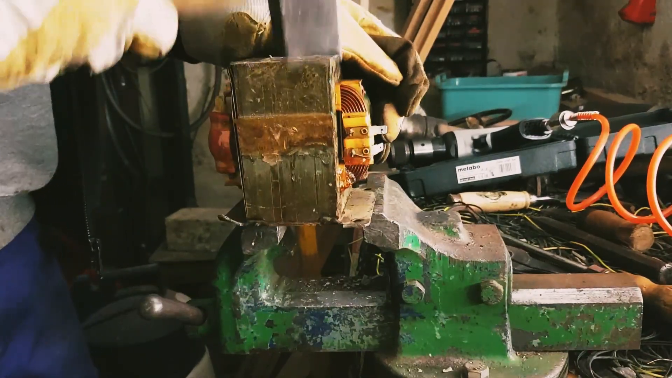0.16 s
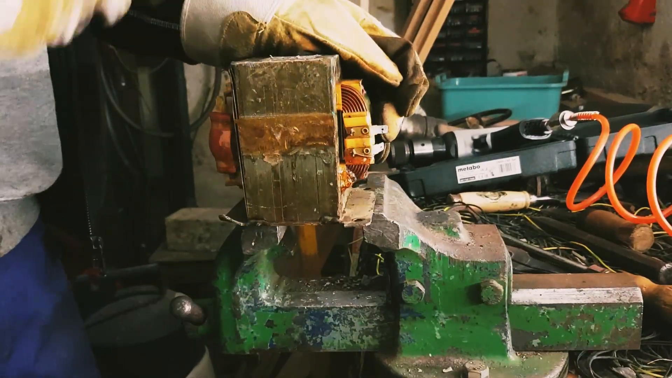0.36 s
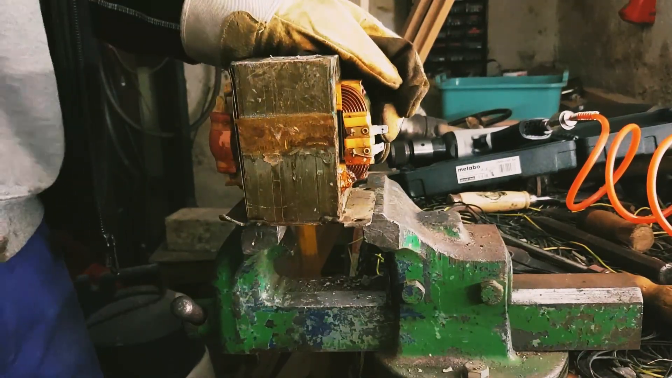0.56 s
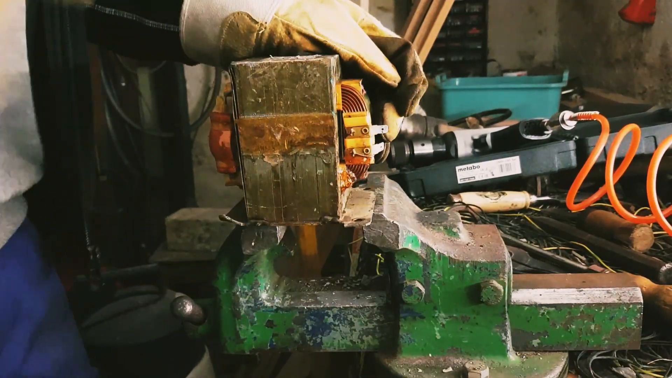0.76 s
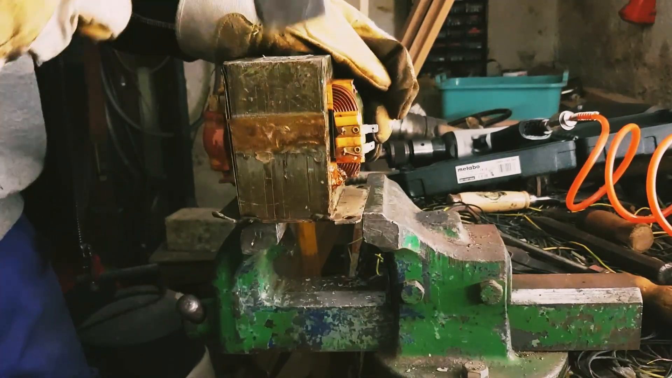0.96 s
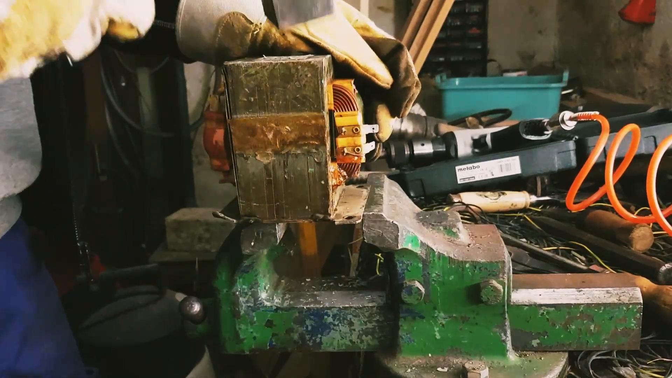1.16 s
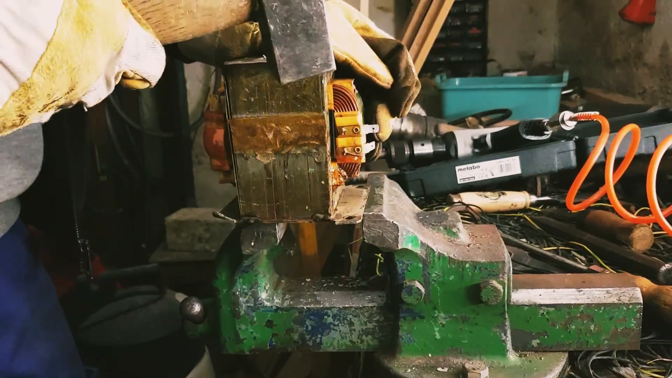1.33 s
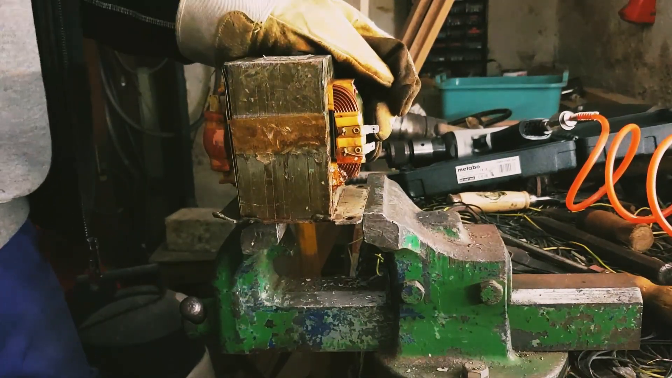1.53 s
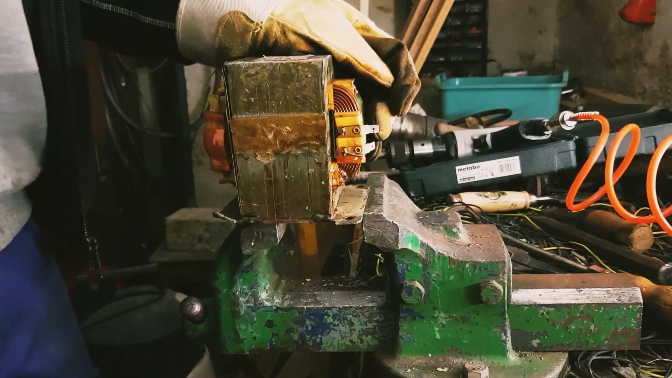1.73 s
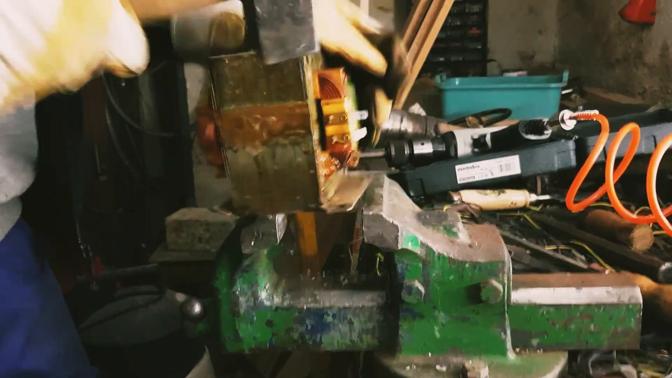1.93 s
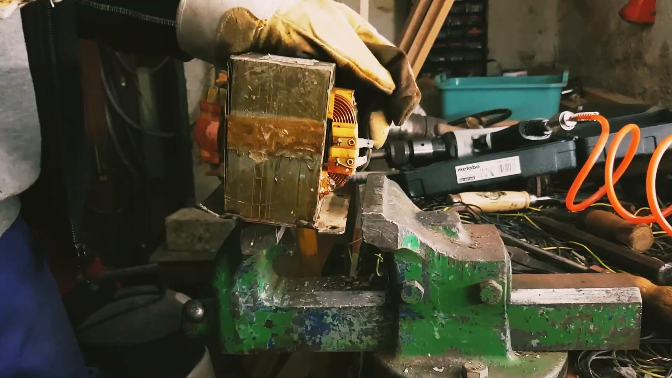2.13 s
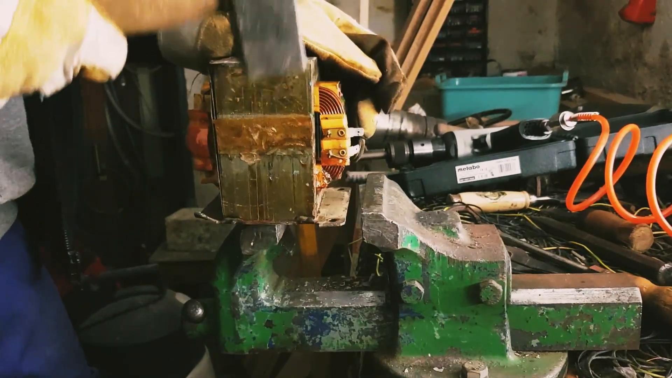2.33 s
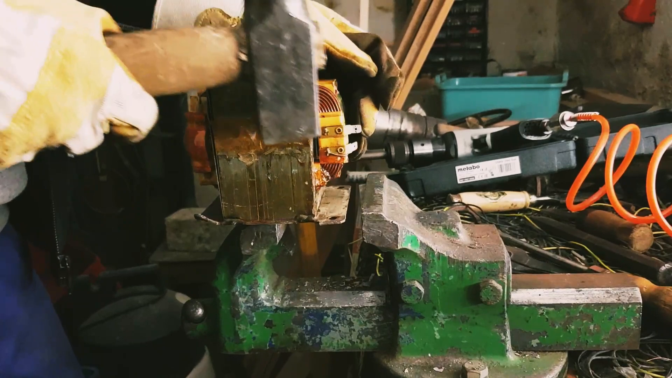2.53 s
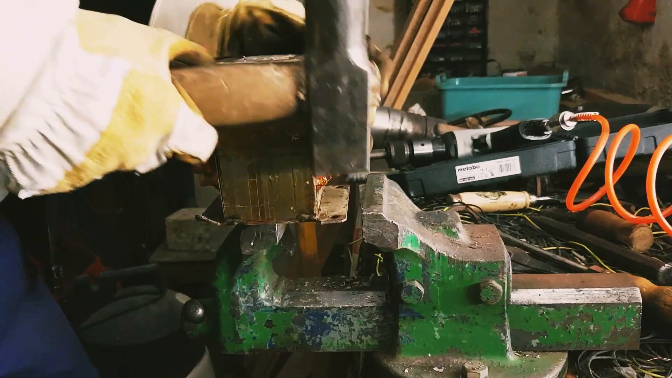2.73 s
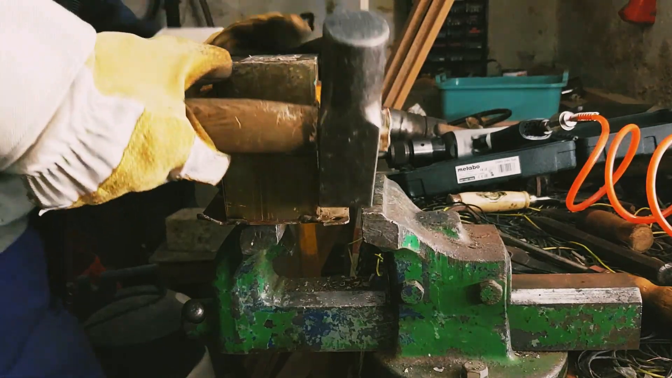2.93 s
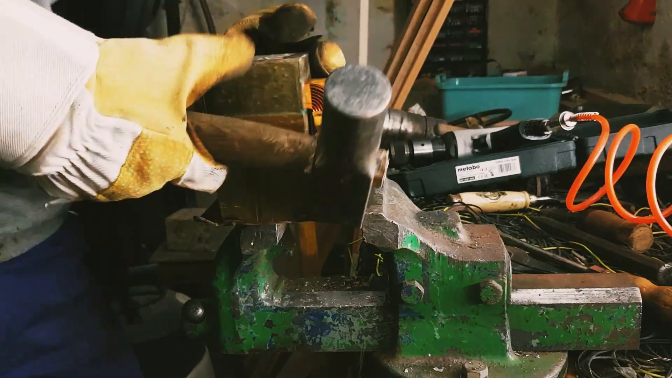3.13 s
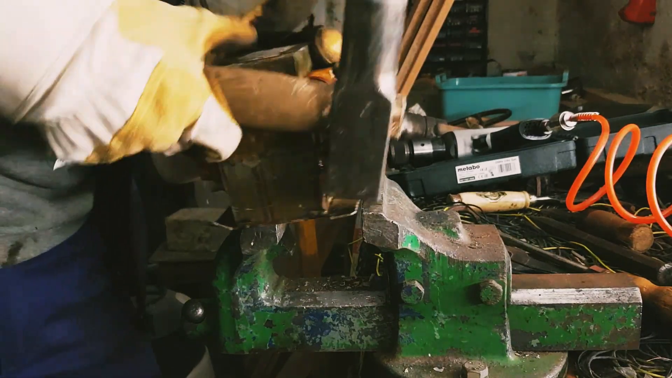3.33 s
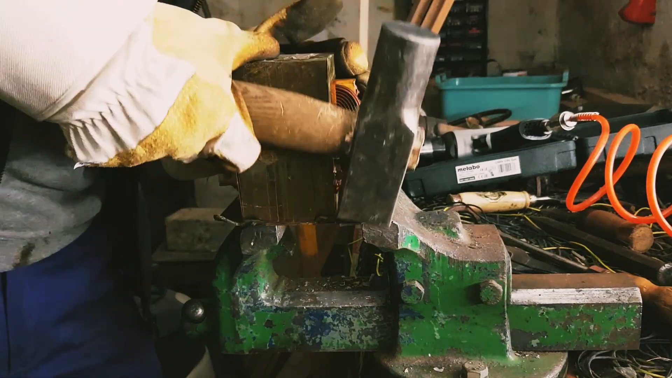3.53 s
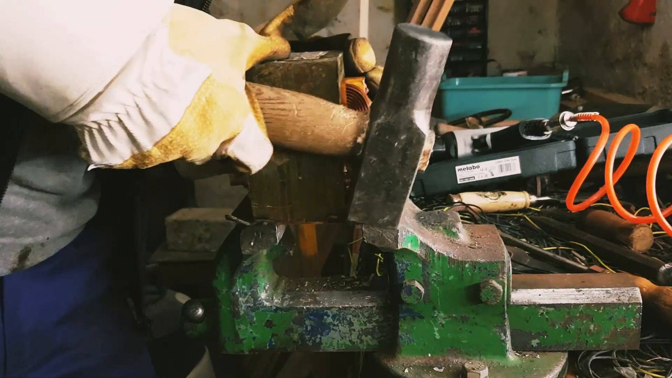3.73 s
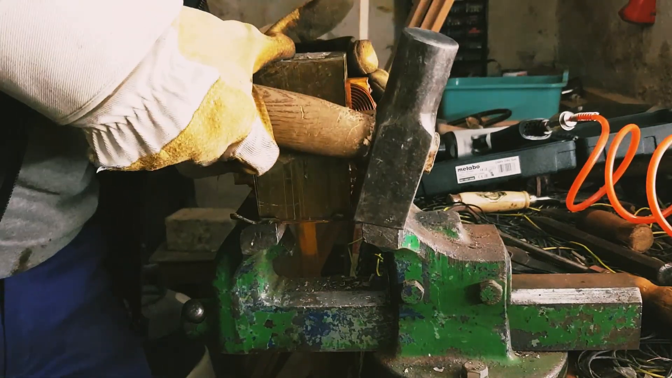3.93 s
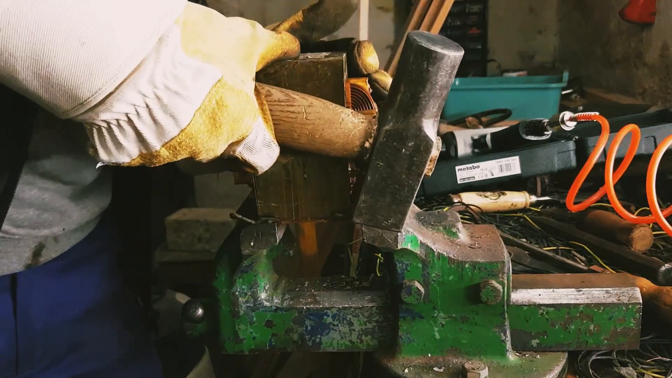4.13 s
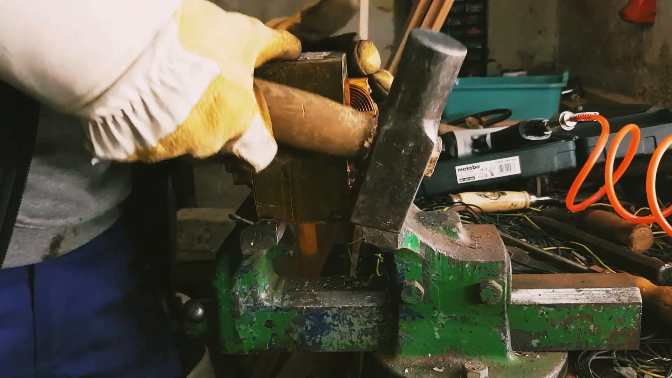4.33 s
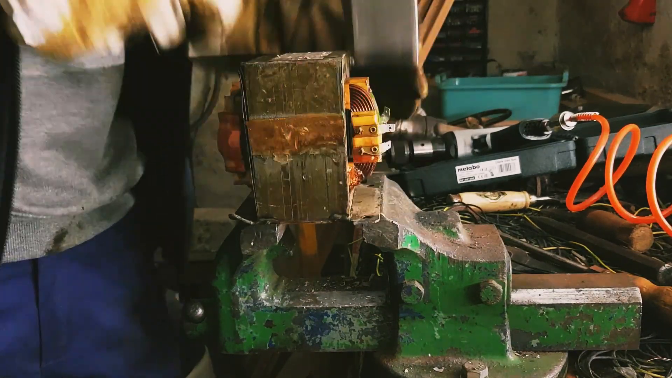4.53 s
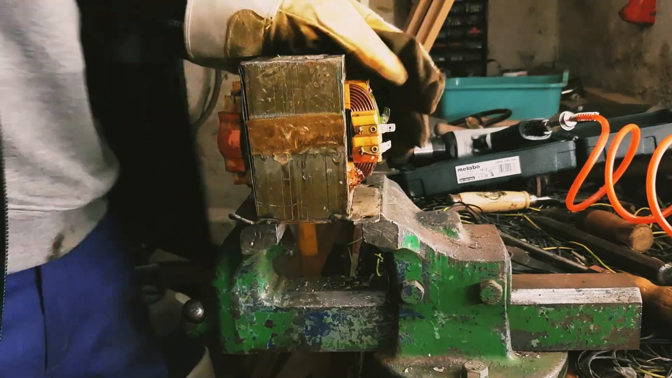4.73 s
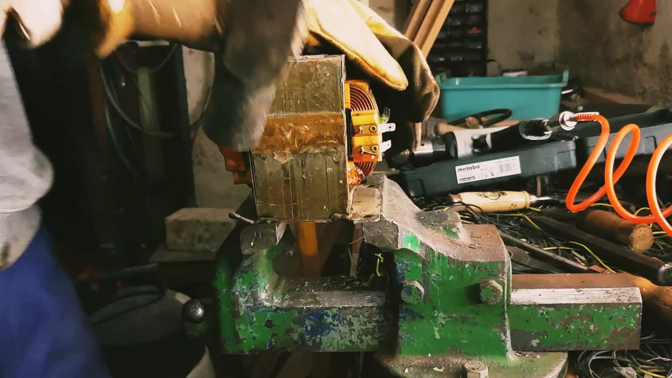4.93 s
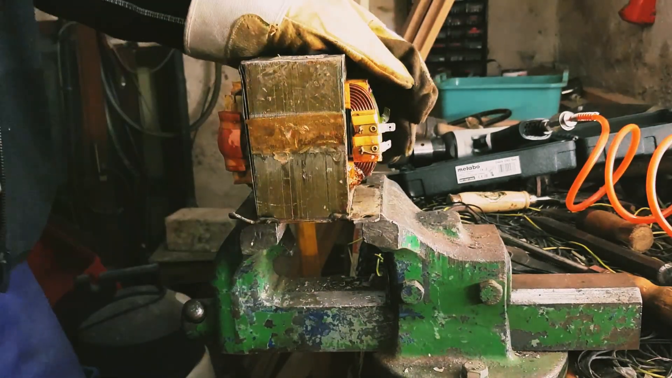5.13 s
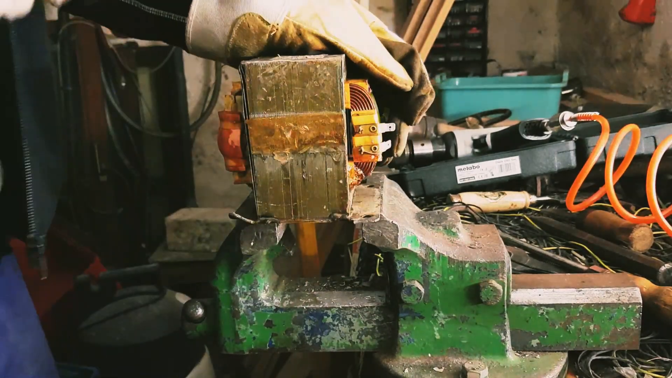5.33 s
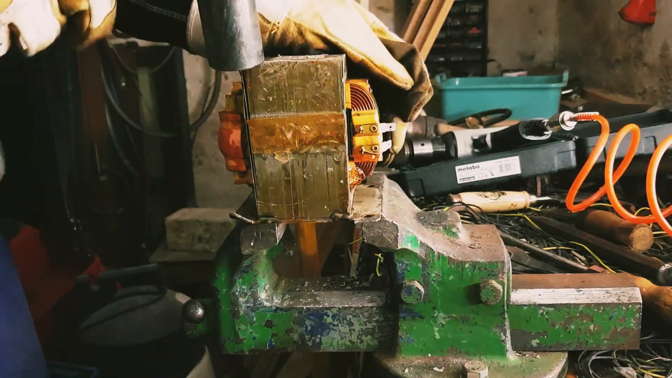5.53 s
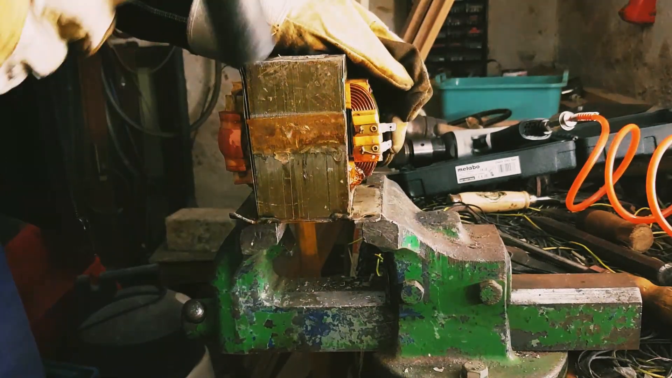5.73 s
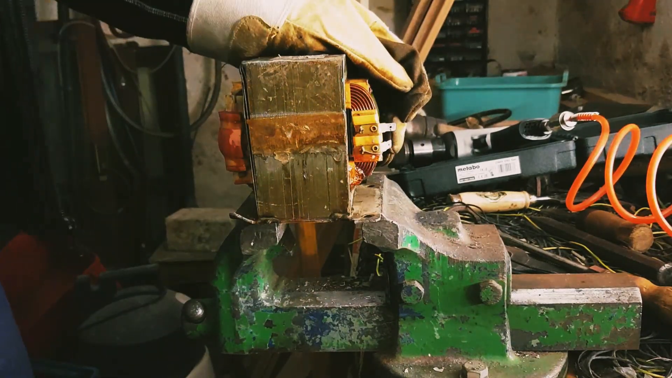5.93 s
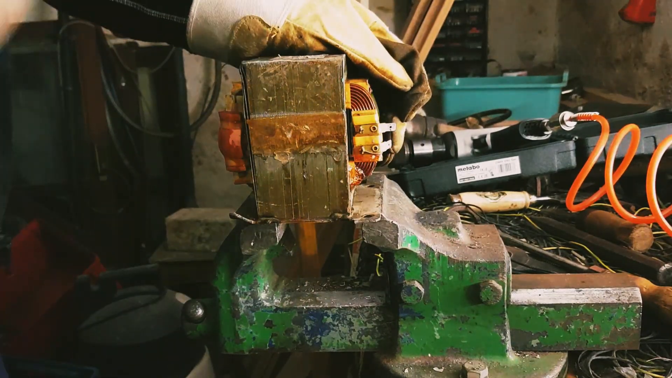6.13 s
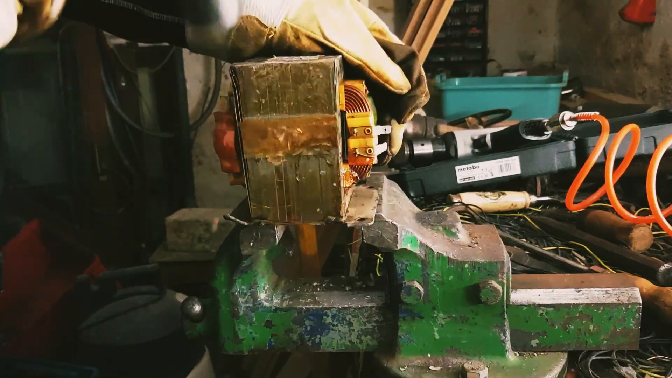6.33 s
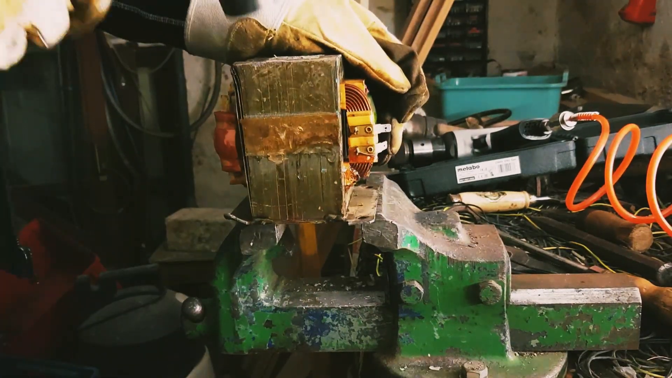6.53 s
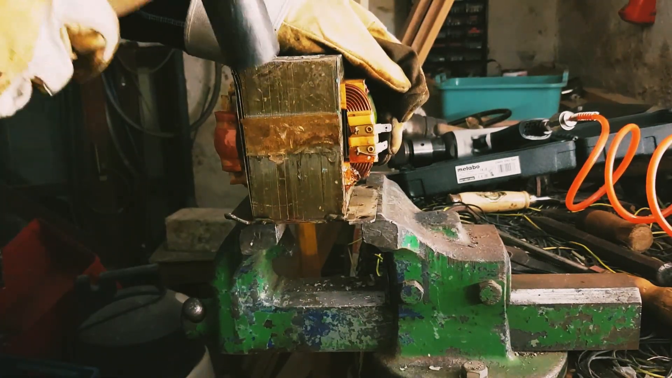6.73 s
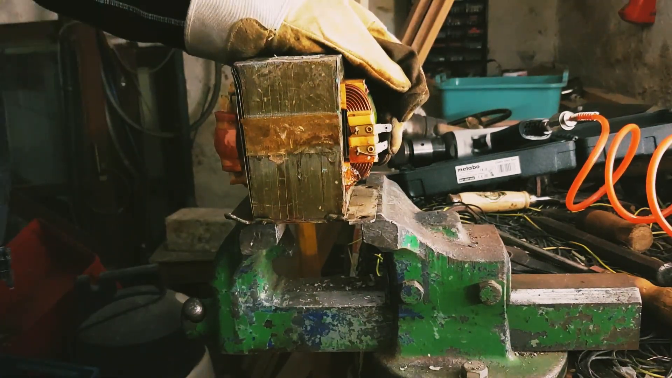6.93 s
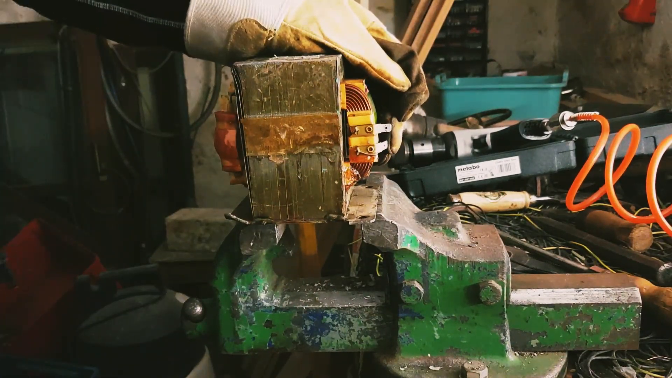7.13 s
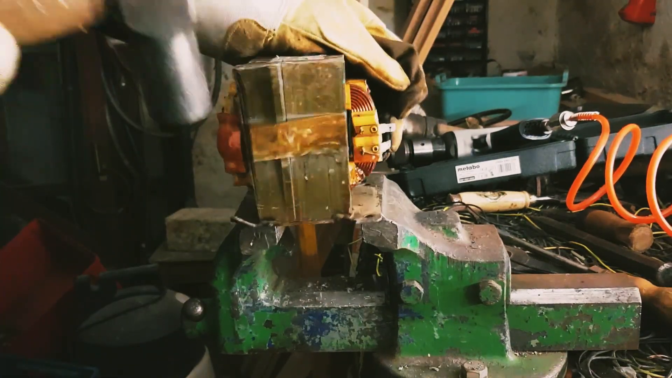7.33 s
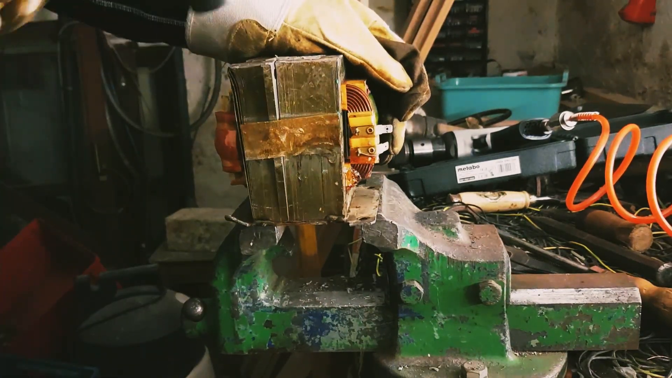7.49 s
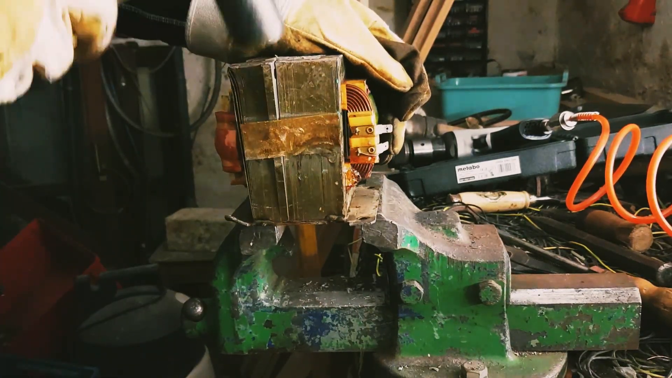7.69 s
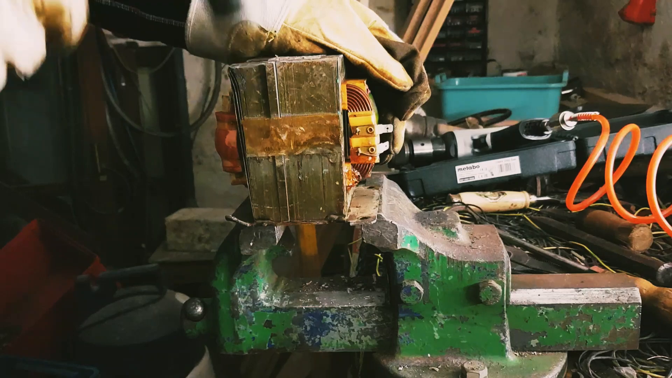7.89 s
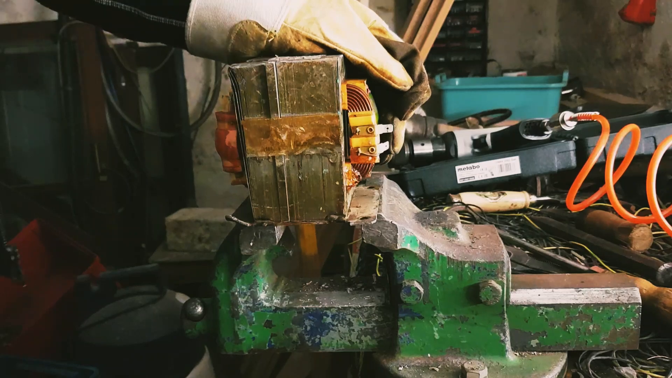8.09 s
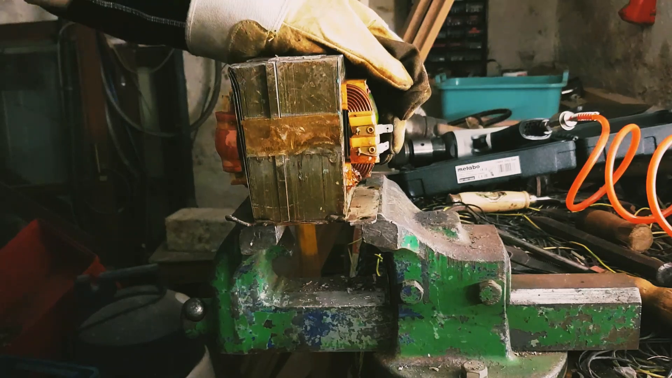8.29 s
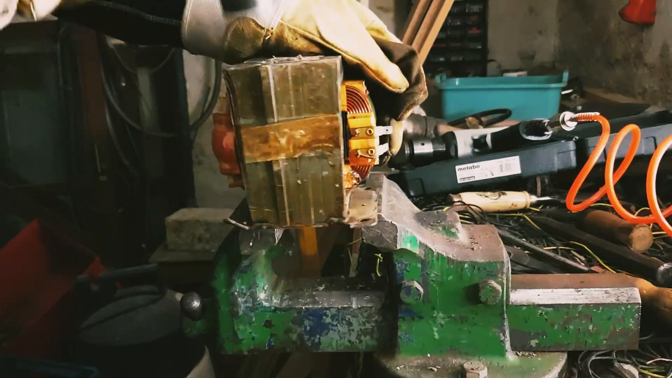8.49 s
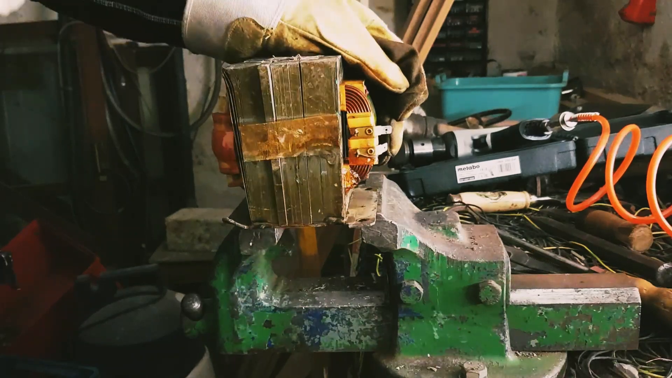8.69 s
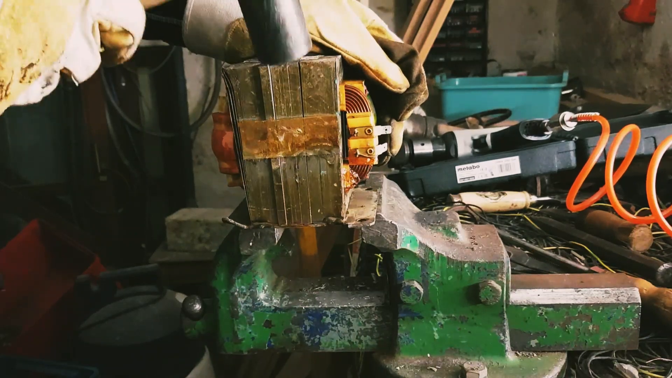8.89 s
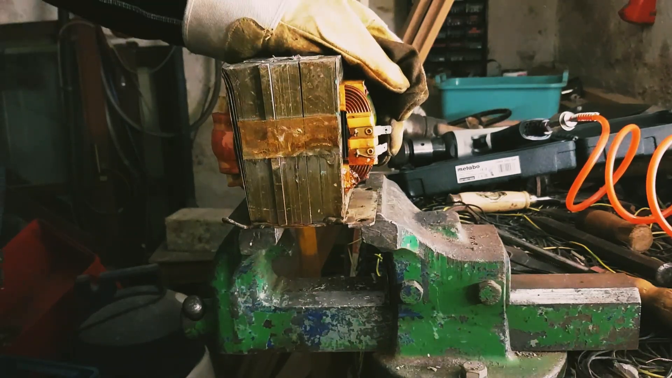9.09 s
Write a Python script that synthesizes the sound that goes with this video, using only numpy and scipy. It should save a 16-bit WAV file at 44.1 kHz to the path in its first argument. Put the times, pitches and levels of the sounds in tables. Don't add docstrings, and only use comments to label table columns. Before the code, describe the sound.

In a small hard-walled workshop, a hammer strikes a laminated steel core clamped in a vise. Two bright, ringing blows come first, then a pause with glove rustle and small knocks, then four more blows about a second apart, each but the first of them sharply ringing. Light taps fall between. Close stereo microphone, the loud onsets squashed and slightly clipped.

```python
import sys
import numpy as np
from scipy import signal
from scipy.io import wavfile

SR = 44100
rng = np.random.default_rng(int(sys.argv[2]) if len(sys.argv) > 2 else 0)


def invert_db(x):
    u = np.asarray(x, float) / 20
    return 10 ** u


def dump_mix(stems):
    frames = np.atleast_2d(stems).T
    limited = np.clip(frames, -1, 1)
    pcm = np.round(limited * 32767).astype(np.int16)
    wavfile.write(sys.argv[1], SR, pcm)


N = 403515

# start_s, clack_db, clack_hz, thud_under_clack_db
KNOCKS = [(0.033, -31.5, 625, -6.5), (0.37, -42, 550, -2.5), (1.300, -29, 1098, -27),
          (1.300, -31.5, 2798, -27), (1.178, -40, 2082, -29), (2.669, -39.5, 930, -21.5),
          (2.763, -46.5, 900, -8), (2.987, -45.5, 1370, -38), (3.062, -48, 867, -24),
          (3.25, -52, 1070, -19), (3.368, -43, 558, -4.5), (3.417, -42.5, 494, 6.5), (3.499, -62, 518, -4),
          (3.594, -45, 685, -13), (3.882, -41.5, 737, -15), (4.29, -42, 760, -16.5), (4.377, -47, 744, -4),
          (4.449, -51, 560, -8.5), (4.836, -45, 3640, -8), (5.328, -52, 3996, -16), (7.518, -54, 546, -6),
          (7.94, -42.5, 1448, -23), (7.944, -47, 3870, -26), (8.03, -56, 483, -18.5),
          (8.078, -53, 3850, -34)]
# start_s, level_db, pitch_hz
TAP_TONES = [(1.301, -35, 1590), (8.857, -48, 2500), (2.672, -55, 1250), (3.065, -63, 1250),
             (3.5, -65, 1250), (3.886, -57, 1800), (4.294, -58, 1800), (0.208, -42, 1500),
             (4.755, -43, 2450), (5.403, -20, 1450), (6.66, -58, 750), (7.765, -50, 2200)]


def at_hz(points, hz, column=1):
    points = np.array(points)
    return np.interp(np.log(hz), np.log(points[:, 0]), points[:, column])


def fall(x, t60):
    return signal.lfilter([1], [1, -invert_db(-60 / (max(t60, .001) * SR))], x + 1e-18)


def smooth(x, seconds):
    r = np.exp(-1 / (max(seconds, 1e-5) * SR))
    return signal.lfilter([1 - r], [1, -r], x)


def ring(force, hz, t60):
    r, w = invert_db(-60 / (t60 * SR)), 2 * np.pi * hz / SR
    return signal.lfilter([0, np.sin(w)], [1, -2 * r * np.cos(w), r * r], force + 1e-18)


def flicker(rate):
    steps = rng.standard_normal(int(N / SR * 200) + 2)
    return np.interp(np.arange(N) / SR * rate, np.arange(len(steps)), steps)


def train(hits, heights):
    out = np.zeros(N)
    np.add.at(out, np.round(hits[:, 0] * SR).astype(int), heights)
    return out


def in_room(tone):
    ports = []
    for lean_db in (-3, -1):
        beating = 1 + .9 * flicker(130.0)
        ports.append(tone * beating * invert_db(2.5 * flicker(18.0) + lean_db))
    return np.array(ports)


def layers(rows, crack_db, clatter_db):
    s, force_db, weight_db, bright_db = np.transpose(rows)
    crack_level_db = force_db + crack_db + 0.62 * bright_db
    clatter_level_db = force_db + clatter_db + 0.12 * bright_db
    return np.transpose([s, crack_level_db, force_db + weight_db, force_db,
                         clatter_level_db, force_db + bright_db])


def small_contacts():
    # start_s, level_db, pitch_hz
    thuds = [(0.209, -36, 250), (1.057, -34, 150), (1.177, -44, 127), (1.301, -44, 250), (2.187, -62, 183),
             (2.69, -60, 320.4), (3.123, -65, 334), (3.309, -50.5, 161), (3.848, -41.5, 253),
             (4.089, -52.5, 256), (6.659, -32.5, 170), (7.569, -49.5, 124), (7.767, -37, 165),
             (8.67, -44.5, 121), (8.857, -57, 260)]
    # start_s, level_db
    ticks = [(0.033, -70), (0.37, -66), (.82, -62), (1.059, -63), (1.178, -57), (2.187, -65), (2.563, -53),
             (2.987, -65), (3.125, -44.5), (3.309, -72), (3.499, -66), (4.377, -65), (4.836, -64),
             (5.329, -68.5), (5.702, -58), (5.79, -67.5), (7.518, -63), (7.568, -61), (7.94, -59.5),
             (8.67, -49.5), (9.089, -65)]
    off, hz = -200, 248
    sizzle_db = -36.5
    rows = [(s, db, clack_hz, db + thud_db, hz, db + sizzle_db) for s, db, clack_hz, thud_db in KNOCKS]
    rows += [(s, db, tone_hz, off, hz, off) for s, db, tone_hz in TAP_TONES]
    rows += [(s, off, hz, db, thud_hz, off) for s, db, thud_hz in thuds]
    rows += [(s, off, hz, off, hz, db) for s, db in ticks]
    return np.array(rows)


def room_boom():
    # pitch_hz, level_db, t60_s
    hz, level_db, t60 = (67, -37.5, 1.3)
    return ring(invert_db(level_db) * (np.arange(N) == 0), hz, t60)


def whine():
    # pitch_hz, level_db, t60_s, damped_s
    hz, level_db, t60, damped_s = (8539.5, -57, 46, 0.27)
    t = np.arange(N) / SR
    touch_db = 200 * np.maximum(t - damped_s, 0)
    return invert_db(level_db - 60 * t / t60 - touch_db) * np.sin(2 * np.pi * hz * t)


def layer_shares(hz):
    layer_hz = (160, 800, 2800, 9000)
    return np.array([np.interp(np.log(hz), np.log(layer_hz), row) for row in np.eye(4)])


def knock_heights(knocks, hz):
    s, clack_db, clack_hz, thud_db, thud_hz, sizzle_db = knocks.T
    clack_octaves = np.log2(hz / clack_hz) / 0.82
    thud_octaves = np.log2(hz / thud_hz) / 0.66
    clack = invert_db(clack_db - 16.0 - 12.0 * clack_octaves ** 2) / np.sqrt(clack_hz / 1000)
    thud = invert_db(thud_db + 3.5 - 17 * thud_octaves ** 2)
    sizzle = invert_db(sizzle_db - 11) / (1 + (5113 / hz) ** 3)
    return np.sqrt(clack ** 2 + thud ** 2 + sizzle ** 2) * invert_db(10.5)


def rub_heights(hz):
    # start_s (centre), half_length_s, level_db (middle pitch), tilt_db (per octave)
    rubs = [(0.61, .08, -88, -19.5), (1.622, 0.084, -103, -23), (3.214, 0.045, -93, 17),
            (3.317, 0.019, -99.5, 16.5), (2.873, .06, -77.5, -4), (3.78, .04, -89, -18.5),
            (4.231, 0.028, -83, -16), (0.35, 0.055, -57.5, -11), (4.689, 0.062, -64.5, 0.5),
            (5.007, 0.059, -60, -2), (5.223, 0.042, -47, -1.5), (6.213, 0.051, -69.5, 3),
            (8.055, 0.14, -77.5, -5)]
    t = np.arange(0, N + 64, 64) / SR
    octaves = np.log2(max(hz, 450) / 1403.5)
    bells = 0
    for s, half, level_db, tilt_db in rubs:
        spectrum_db = level_db + tilt_db * octaves - 2.06 * octaves ** 2
        bells = bells + invert_db(spectrum_db - 12 * ((t - s) / half) ** 2)
    return np.repeat(bells, 64)[:N]


def clatter_and_rustle(blows, taps, knocks):
    # pitch_hz, density_db (per Hz)
    colour = [(24, -46), (40, -19.5), (138, -8.5), (263, -7), (582, -12.5), (643, -11.5), (956, -16),
              (1870, -16), (2580, -18), (4230, -20), (7490, -32.5), (10100, -26.5), (13900, -30),
              (15000, -35)]
    # pitch_hz, density_db (per Hz)
    hush_colour = [(40, -15), (64, -2), (135, -11), (263, -9.5), (600, -11.5), (2450, -17), (5400, -20),
                   (8000, -29), (11000, -19), (15000, -20.5)]
    # pitch_hz, rise_s, t60_s, late_tail_db, late_t60_s
    dying = [(40, 0.031, 0.67, -17.5, 1.9), (111, 0.026, .45, -21, .9), (370, 0.012, 0.3, -29, 0.59),
             (1500, 0.004, .27, -36.5, 0.58), (5000, 0.0027, 0.23, -39.5, 0.97),
             (15000, 0.0013, 0.17, -40, 0.4)]
    # pitch_hz, correlation (-1 to 1)
    likeness = [(60, 0.93), (180, 0.89), (550, 0.49), (1650, 0.32), (4970, -0.084), (15000, -0.22)]
    # pitch_hz, difference_db
    lean = [(60, 0), (240, -2.5), (950, -4), (3770, -5.5), (15000, -3)]
    # start_s, activity (0-1)
    handling = [(0.0, 0.83), (.7, 0.15), (1.5, 0.05), (1.8, 0), (2.25, 0.05), (2.4, 0.39), (2.6, 0.07),
                (3.4, 0.48), (3.6, 0.24), (4.25, 0.15), (4.44, 0.69), (4.55, 0.59), (4.7, 0.32),
                (4.95, 0.83), (5.599, 0.9), (5.8, 0.76), (5.951, 0.5), (6.2, 0.17)]
    quiet_db = (-99, -94, -87, -90.5)
    busy_db = (-63, -70.5, -63.5, -63)
    waking = (0.12, .7, 0.79, 1.1)
    out = np.zeros((2, N))
    edges = 36 * 2 ** (np.arange(27.5) / 3)
    white = rng.standard_normal((2, 2, N))
    busy = np.clip(np.interp(np.arange(0, N, 64) / SR, *np.transpose(handling), right=0), 0, 1)
    rubbing_db = np.array([still + (full - still) * busy ** power
                           for still, full, power in zip(quiet_db, busy_db, waking)])
    grit, loose = invert_db(1.7 * flicker(41.0)), invert_db(0.98 * flicker(55.0))
    for k, (low, high) in enumerate(zip(edges, edges[1:])):
        band = signal.butter(2, [low, high], "band", fs=SR, output="sos")
        mid, side = signal.sosfilt(band, white[k % 2])
        hz = min(np.sqrt(low * high), 14500)
        shares, colour_db = layer_shares(hz), at_hz(colour, hz)
        rise, t60, late_db, late_t60 = [at_hz(dying, hz, column=c) for c in range(1, 5)]
        heavy = train(blows, invert_db(blows[:, 2:] @ shares + colour_db + 18))
        light = train(taps, invert_db(taps[:, 2:] @ shares + colour_db + 18.5))
        light = light + train(knocks, knock_heights(knocks, hz))
        struck = smooth(heavy, rise) + smooth(light, 0.12 * rise)
        answer = (fall(struck, t60) + invert_db(late_db) * fall(struck, late_t60)) * loose
        activity_db = np.repeat(shares @ rubbing_db, repeats=-(-N // len(busy)))[:N]
        hush = invert_db(activity_db + at_hz(hush_colour, hz) + 22.5)
        rubbing = grit * (hush + invert_db(6.0) * rub_heights(hz))
        alike = np.clip(at_hz(likeness, hz) - 0.083 * shares[1:].sum(), -1, 1)
        stereo = np.sqrt(1 + alike) * mid + np.sqrt(1 - alike) * side * [[1], [-1]]
        balance = invert_db(at_hz(lean, hz) / 2 * np.array([[1], [-1]]))
        out += np.hypot(answer, rubbing) * stereo * balance
    return out


def bench(blows, taps, knocks):
    # pitch_hz, level_db, t60_s
    low_modes = [(49.4, -17.5, 0.96), (71.9, -8.5, 0.9), (107, -17, 0.31), (146.4, 4, 0.19),
                 (173.6, -2, 0.49), (240.4, 0, 0.27), (262, 0, 0.3), (328.3, -1, 0.25), (377.7, -1.5, .33),
                 (437, -6, 0.35), (483, -10.5, 0.44), (609, -10.5, 0.29), (753, -3, .22)]
    pushes = train(blows, invert_db(blows[:, 2] - 35)) + train(taps, invert_db(taps[:, 2] - 37))
    hard = smooth(fall(pushes, 0.14), 0.01)
    soft = smooth(fall(train(knocks, invert_db(knocks[:, 3] - 37.0)), 0.14), 0.0049)
    white = rng.standard_normal((3, N))
    boom = np.zeros(N)
    for k, (hz, level_db, t60) in enumerate(low_modes):
        shake = hard + soft / (1 + (hz / 330) ** 6)
        boom += invert_db(level_db) * ring(shake * white[k % 3], hz, t60)
    return boom * invert_db(np.array([[-1.0], [1.0]]))


def core(hits):
    # pitch_hz, level_db, t60_s
    plate_modes = [(1111, -2.5, 0.18), (1407, -6.5, 0.26), (1669, -10.5, 0.15), (1927, -5.5, 0.26),
                   (2150, -8, 0.2), (2455, -13, 0.26), (2980, -12.5, 0.19), (3097, 0, 0.1),
                   (3280, -13, 0.23), (3310, -12, 0.23)]
    shake = fall(train(hits, invert_db(hits[:, 4] - 36)), .09) * rng.standard_normal((4, N))
    clang = np.zeros((2, N))
    for k, (hz, level_db, t60) in enumerate(plate_modes):
        clang += invert_db(level_db) * ring(shake[k % 2::2], hz, t60)
    return invert_db(np.array([[-1.5], [1.5]])) * clang


def clacks(knocks, cycles, level_db):
    length = 8000
    out = np.zeros(N + length)
    rough = rng.standard_normal((len(knocks), length)) * invert_db(-60 * np.arange(length) / SR / 0.0079)
    for (s, clack_db, clack_hz, *_), push in zip(knocks, rough):
        start = round(s * SR)
        out[start:start + length] += invert_db(clack_db + level_db) * ring(push, clack_hz, cycles / clack_hz)
    return out[:N] * invert_db(np.array([[-2.0], [1.5]]))


def crack(hits):
    # low_hz, high_hz
    crack_hz = (900, 6860)
    burst = fall(train(hits, invert_db(hits[:, 1] - 7)), .012) * rng.standard_normal((2, N))
    burst[1] = 0.23 * burst[0] + .6 * burst[1]
    return signal.sosfilt(signal.butter(1, crack_hz, "band", fs=SR, output="sos"), burst)


def hammer_head():
    # start_s, level_db, brightness_db (per octave)
    drives = [
        (0.209, -46, -10.5),
        (0.83, -26, -3),
        (1.919, -27.5, -1.5),
        (6.2189, -31, 3.5),
        (7.2476, -27, -1),
        (8.3907, -28, 0.7),
    ]
    # t60_s, level_db
    head_modes = [(.24, 3), (.22, 7), (.17, 11), (.18, 12), (.15, 12)]
    flat_hz = (4290, 7031, 8543, 10310, 13980)
    edge_hz = (4285, 7084, 8543, 10370, 14090)
    reach_db = (2.5, -5.5, -8, -2.5, -1)
    turned_s, rise_s = 3, .016
    drives, out, t = np.array(drives, float), np.zeros((2, N)), np.arange(N) / SR
    for k, (t60, level_db) in enumerate(head_modes):
        bright_db = drives[:, 2] * np.log2(flat_hz[k] / flat_hz[0])
        clicks = train(drives, invert_db(drives[:, 1] + bright_db + reach_db[k] + level_db))
        strength = smooth(fall(clicks, t60), rise_s)
        hz = np.where(t < turned_s, flat_hz[k], edge_hz[k])
        out += in_room(strength * np.sin(2 * np.pi * hz * t))
    return out


def rod():
    # start_s, level_db
    clinks = [
        (2.194, -53.5),
        (4.7571, -44.5),
        (5.0666, -37),
        (5.0748, -39),
    ]
    # pitch_hz, level_db, t60_s
    rod_modes = [(938, -11.5, 0.11), (1864, -9, 0.13), (2350, -4.5, 0.071), (3480, -9, 0.11),
                 (11260, -3, 0.14), (13800, -10, .1)]
    clinks = np.array(clinks, float)
    luck = rng.standard_normal((len(clinks), len(rod_modes)))
    tone = np.zeros(N)
    for (hz, level_db, t60), chance in zip(rod_modes, luck.T):
        tone += ring(train(clinks, invert_db(clinks[:, 1] + level_db + 1.9 * chance)), hz, t60)
    return in_room(tone)


def scene():
    # start_s, force_db, bench_weight_db, brightness_db
    heavy = [
        (0.83, -13.5, -7, 1.2),
        (1.919, -11.5, -5.5, 3),
        (5.4, -17, -5.5, -8.5),
        (6.218, -11, -8, -5),
        (7.246, -15, -3, 0.6),
        (8.394, -11.5, -5.5, -1.3),
    ]
    # start_s, force_db, bench_weight_db, brightness_db
    light = [
        (0.207, -32, 1.1, -11),
        (0.89, -15.5, -4, -10.5),
        (1.299, -39, .6, -12.5),
        (4.753, -46, -19, 2.5),
        (5.067, -45, -11, 1),
        (5.702, -49, 1.5, -3.5),
        (6.659, -43, 6, -6),
        (7.763, -49.5, 8.5, 19.5),
        (8.857, -44.5, 5.5, -18.5),
    ]
    # start_s, force_db, bench_weight_db, brightness_db
    earlier = [
        (0.0, -42, 12, -15),
    ]
    blows = layers(heavy, crack_db=13, clatter_db=-2.5)
    taps = layers(light + earlier, crack_db=19, clatter_db=2)
    blows[:, 1:] += 9.5
    knocks = small_contacts()
    hits = np.vstack([blows, taps])
    fresh_hits = np.vstack([blows, taps[:len(light)]])
    low = room_boom() + bench(blows, taps, knocks)
    clicks = clacks(KNOCKS, cycles=14.0, level_db=-17) + clacks(TAP_TONES, cycles=220.0, level_db=-14)
    steel = whine() + core(hits) + clicks + crack(fresh_hits) + hammer_head() + rod()
    return low + steel + clatter_and_rustle(blows, taps, knocks)


def band_limit(x):
    return signal.sosfilt(signal.butter(12, 16660, fs=SR, output="sos"), x)


def record(dry):
    ceiling_db, release_db_per_s, attack_s = -2, 154, 0.00045
    over_db = np.maximum(20 * np.log10(np.abs(dry).max(axis=0) + 1e-9) - ceiling_db, 0)
    ramp = release_db_per_s * np.arange(N) / SR
    held_db = np.maximum.accumulate(over_db + ramp) - ramp
    limited = dry * invert_db(-smooth(held_db, attack_s))
    bass_cut = signal.butter(5, 50, "high", fs=SR, output="sos")
    limited = signal.sosfilt(bass_cut, limited)
    clipped = 1.238 * np.tanh(limited / 1.037)
    top_cut = signal.cheby2(12, 60, 16630, fs=SR, output="sos")
    return band_limit(signal.sosfilt(top_cut, clipped))


dry = scene()
out = record(dry)
dump_mix(out)
```